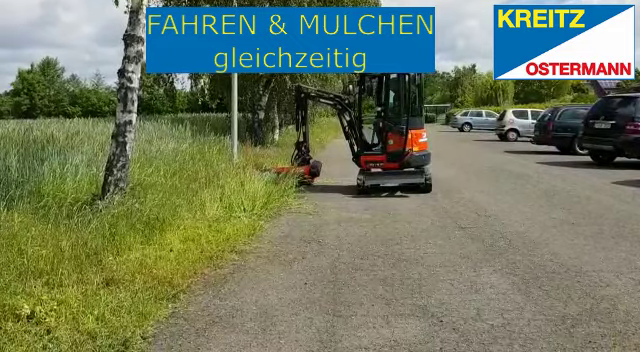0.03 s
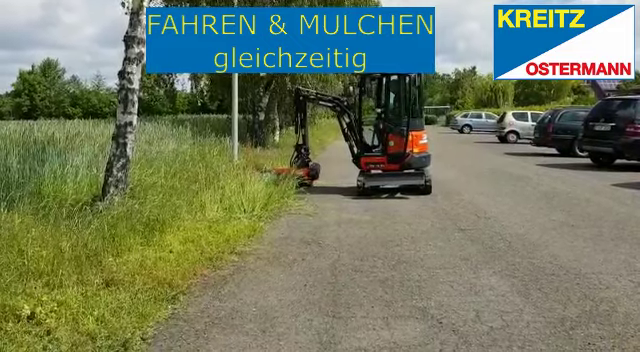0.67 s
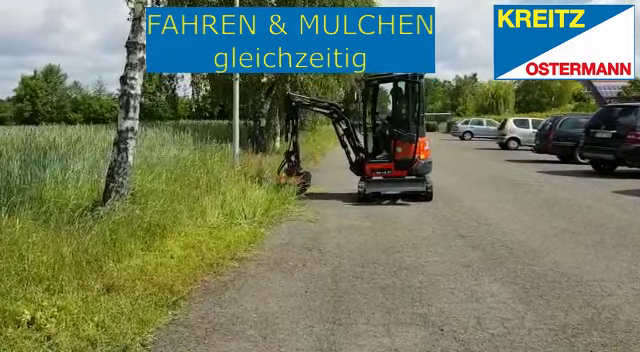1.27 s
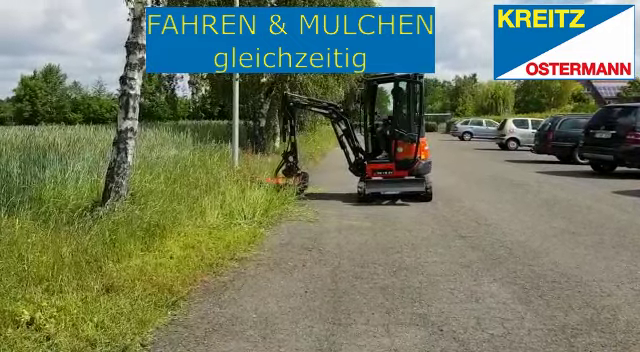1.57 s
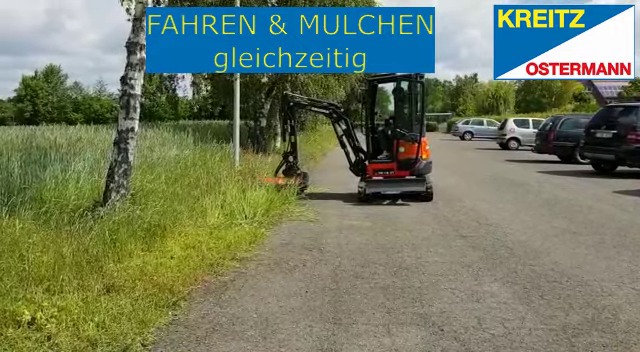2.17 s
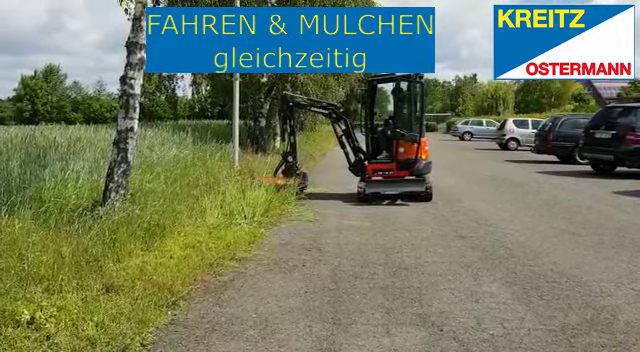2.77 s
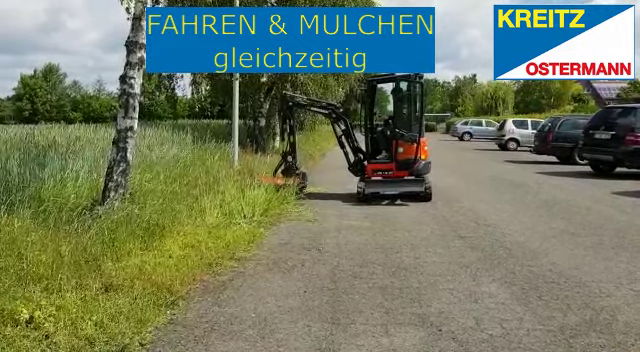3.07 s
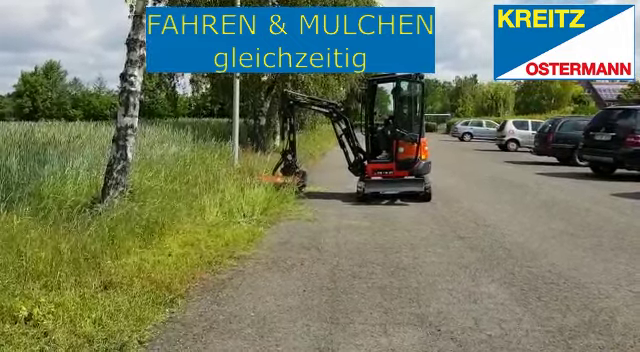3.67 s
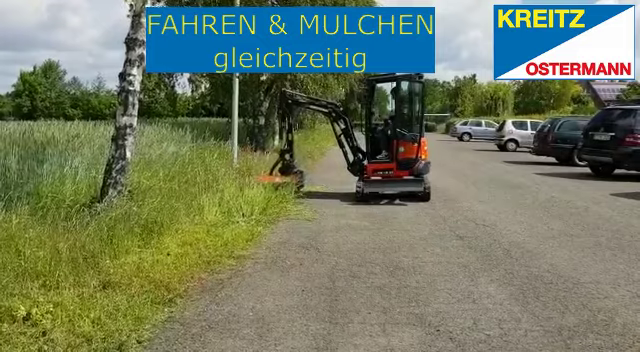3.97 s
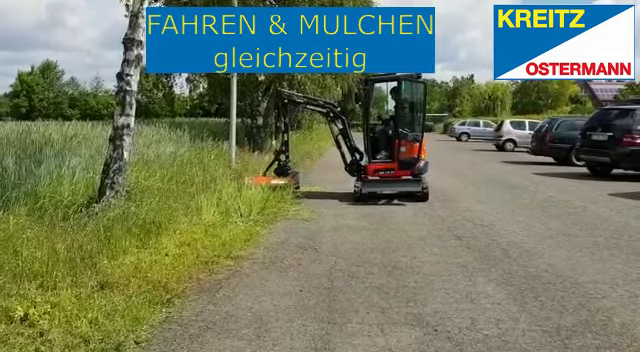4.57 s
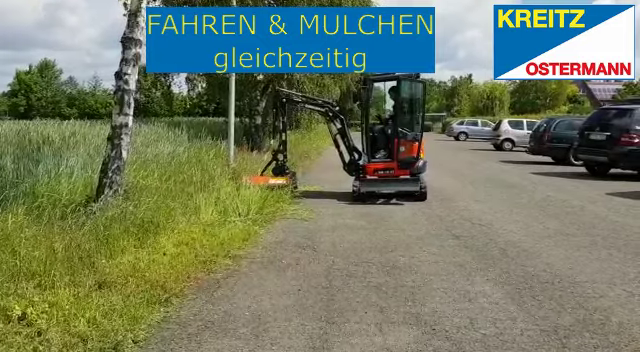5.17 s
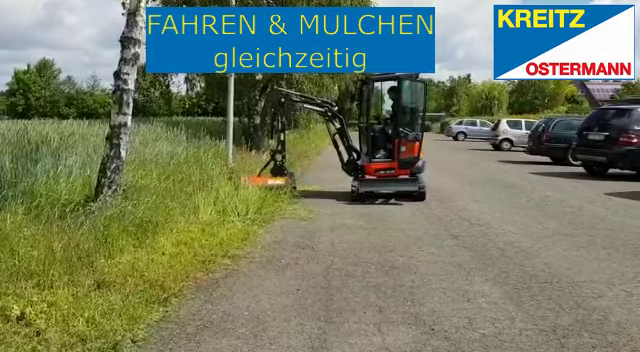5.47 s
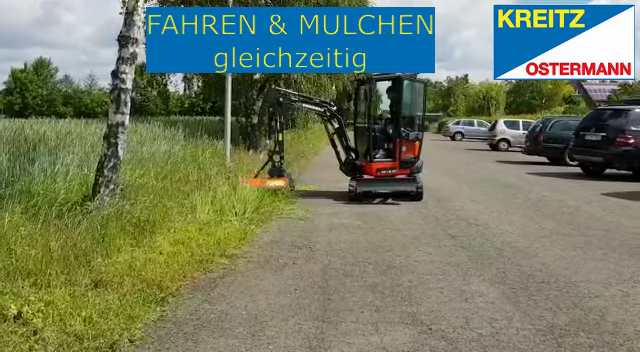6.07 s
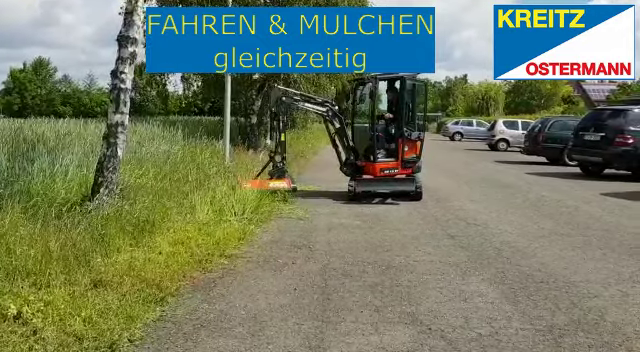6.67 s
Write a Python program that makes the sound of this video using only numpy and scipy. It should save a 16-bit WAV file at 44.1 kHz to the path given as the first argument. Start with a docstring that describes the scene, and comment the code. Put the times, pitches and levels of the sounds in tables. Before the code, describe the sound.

Steady diesel drone and clatter of a small excavator mulching grass, with occasional sharp snaps and a light breeze on the microphone.

```python
"""Car park, grass verge: a mini excavator creeps along with a mulching head on its boom.
The diesel drones at working speed, one exhaust pulse per firing; its fan beats against it, its covers
drum and clatter. The flails shred grass in swells, crunch tufts, snap stalks and graze something hard.
The hydraulic pump hums and whines under load. A light breeze buffets two microphone ports."""
import sys
import numpy as np
from scipy import signal
from scipy.fft import rfft, irfft, next_fast_len
from scipy.io import wavfile

SR = 44100
rng = np.random.default_rng(int(sys.argv[2]) if len(sys.argv) > 2 else 0)


def dump_mix(stems):
    """Bounce the given channels to the path in sys.argv[1] as a 16-bit WAV at rate SR."""
    frames = np.atleast_2d(stems).T  # one column per channel
    limited = np.clip(frames, -1, 1)  # hard clip at full scale
    pcm = np.round(limited * 32767).astype(np.int16)
    wavfile.write(sys.argv[1], SR, pcm)


N = 305172
TIME_S = np.arange(N) / SR
FFT_SIZE = 2 * next_fast_len(N // 2 + 4096)
BINS_HZ = np.maximum(np.arange(FFT_SIZE // 2 + 1) * SR / FFT_SIZE, 1)

# All table levels are relative.
# Diesel speed under the governor. Each row: time in seconds, firing rate in Hz.
FIRING_HZ = [(0.0, 57.22), (0.42, 57.07), (0.6, 58.07), (0.8, 56.22), (1.33, 57.61), (1.66, 57.13),
             (1.86, 55.9), (2.05, 56.67), (3.1, 56.46), (3.29, 57.38), (3.49, 55.06), (3.85, 57.21),
             (4.1, 56.35), (4.47, 57.44), (4.91, 55.81), (5.15, 56.92), (5.42, 56.42), (5.73, 57.72),
             (5.98, 56.33), (6.3, 57.05), (6.92, 57.08)]
# Engine load, rising as the machine nears. Each row: time in seconds, exhaust in dB, drumming in dB.
ENGINE_LOAD = [(0, -23.5, -35), (.9, -24, -34.5), (1.45, -23, -33), (2.8, -22, -33.5), (4.1, -22.5, -32.5),
               (6.92, -23, -32.5)]
# Exhaust pulse, its upper orders, fan and gears. Each row: multiple of the firing rate, level in dB.
EXHAUST_ORDERS = [(1, 1.5), (2, 1.5), (3, 0.57)]
BARK_ORDERS = [(4, -39.5), (5, -34.5), (6, -42), (7, -58.5)]
FAN_ORDERS = [(3.36, -40), (4.888, -39.5), (6.33, -46.5), (9.776, -53.5), (17, -58), (20, -57.5),
              (29.3, -63), (30, -59), (34, -63.5)]
# Grass feed into the head. Each row: time in seconds, shredding in dB.
GRASS_FEED = [(0.0, -48), (0.55, -52.5), (0.75, -57), (0.87, -46.5), (1.15, -42.5), (1.6, -42.5),
              (2.3, -47.5), (2.55, -54.4), (2.95, -59.5), (3.8, -55.8), (4.0, -47), (4.26, -38),
              (4.6, -42.5), (4.92, -52), (5.3, -43.5), (5.75, -42), (5.9, -45.5), (6.52, -39), (6.92, -46)]
# Tough tufts. Each row: centre in seconds, half length in seconds, chopping in dB, crunching in dB.
TOUGH_TUFTS = [(1.145, 0.026, -43, -40), (1.375, .016, -49, -39), (1.421, 0.0057, -49, -34.5),
               (1.562, .01, -43, -37), (1.594, 0.018, -32, -35.5), (1.92, 0.032, -39.5, -42.5),
               (2.27, 0.037, -48, -56), (4.178, 0.011, -40, -45), (4.266, 0.017, -33, -49),
               (6.13, 0.042, -41, -44.5), (6.506, 0.019, -41, -42)]
# Flail hits on stalks and grit. Each row: start in seconds, level in dB.
STALK_HITS = [(0.498, -46), (0.6044, -44), (0.9355, -42.5), (1.6594, -33.5), (1.9817, -38), (2.108, -38.5),
              (2.2363, -37.5), (2.283, -39), (2.3446, -44), (3.0963, -52), (3.6287, -42.5), (4.0463, -31.5),
              (4.3865, -41), (5.405, -40), (6.6313, -34)]
# Blade grazes. Each row: centre in seconds, half length in seconds, pitch in Hz, level in dB.
BLADE_GRAZES = [(5.755, .022, 4330, -44), (5.765, .016, 6950, -42)]
# Open hydraulic valves. Each row: start in seconds, end in seconds, hum in dB, whine in dB.
VALVE_OPENINGS = [(0, .4, -53, -53), (0.43, 1.17, -47, -55), (4.263, 4.965, -43, -60),
                  (5.022, 6.203, -46.5, -68), (6.378, 6.92, -41, -62)]
# Gusts. Each row: centre in seconds, half length in seconds, level in dB.
WIND_GUSTS = [(3.56, .15, -45), (4.6, .15, -42), (5.1, 0.15, -33), (5.71, 0.22, -34.5), (6.253, 0.36, -38),
              (6.89, 0.31, -32)]
# Source spectra. Each row: frequency in Hz, spectral density in dB.
DRUMMING_SPECTRUM = [(30, -19), (90, -31.5), (140, 2), (195, 4), (240, 0.5), (300, -1.5), (370, -10.5),
                     (480, -31), (800, -47)]
CLATTER_SPECTRUM = [(200, 1.5), (450, 3), (700, 0.5), (950, -4), (1350, -9.5), (1700, -9.5), (2150, -11),
                    (2600, -16.5), (3100, -11), (4500, -14.5), (7000, -36), (16000, -39)]
SHRED_SPECTRUM = [(300, 3), (1500, -22), (2200, 1), (3000, -3), (4500, 4.5), (9000, 0.5), (16000, 1.5)]
CHOP_SPECTRUM = [(150, -8.5), (450, -2), (800, 3), (1100, -6), (1400, -10), (1900, -2), (2150, -18.5),
                 (2600, -6), (3500, -8), (7000, -8.5), (16000, -51)]
CRUNCH_SPECTRUM = [(500, -28), (1500, -3), (3300, 4.5), (5500, 4.5), (7000, -0.5), (10000, -8),
                   (16000, -20)]
SNAP_SPECTRUM = [(500, -17), (2300, -6), (3800, 4), (6000, 1), (9000, -5), (12000, -4), (16000, -3)]
OIL_SPECTRUM = [(300, -17), (550, -2.5), (800, 11.5), (1000, -11.5), (1400, -3), (1700, -15), (2200, -27),
                (5000, -14)]
HISS_SPECTRUM = [(500, -26), (1000, -7.5), (1500, 1.5), (2100, -3.5), (2600, 3), (3500, -7.5), (8000, -21)]
BREEZE_SPECTRUM = [(15, -11), (35, -12), (65, 0.5), (100, -3.5), (160, -6), (300, -28.5), (1000, -90)]
# Resonances of panels and oil flow. Each row: centre in Hz, width in Hz, gain in dB.
PANEL_RESONANCES = [(1860, 63, 0), (2176, 115, -17.5), (2380, 490, 13.5), (3830, 99, 0)]
OIL_RESONANCES = [(1846, 20, 40), (2460, 120, 10), (830, 76, 2.3)]
# Narrow treble peaks of the microphone ports, colouring the shredding.
# Each row: centre in Hz, width in Hz, gain in dB.
PORT_RIPPLE_PEAKS = [(4250, 230, 7.7), (5170, 100, 2.9), (5960, 160, 2.8), (11460, 400, 1.1),
                     (14720, 210, 16.8), (15650, 300, 5.5)]
# Microphone port responses. Each row: frequency in Hz, gain in dB.
LEFT_RESPONSE = [(55, -2.5), (120, -0.06), (300, 0.66), (600, 0), (2400, -6.5), (3800, -10), (4500, -6.5),
                 (6800, -7), (7400, -25), (8050, -6), (9200, 15.5), (10400, 7), (12100, 11), (13400, -5),
                 (16000, -10)]
RIGHT_RESPONSE = [(55, 0.5), (120, -0.6), (300, 2), (600, 4), (2500, 2.5), (3200, -2.5), (4400, 2),
                  (6000, 3), (6850, -1), (7500, -13), (8700, -12), (9700, -8.5), (10900, 8.5), (12300, 0.5),
                  (13200, -7), (16000, -14)]
# Likeness of the ports. Each row: frequency in Hz, correlation (negative in opposite phase).
PORT_CORRELATION = [(100, 1), (500, 0.96), (1100, 0.84), (1600, 0.77), (2500, 0.31), (3200, -0.13),
                    (3900, 0.45), (4350, -0.71), (5800, -0.82), (6700, 0.1), (8500, -0.51), (9700, 0.48),
                    (10800, 1), (13300, 0.63), (15000, 0.6)]


def diesel(firings, exhaust_db, drumming_db):
    """Exhaust orders sum to one pulse per firing; upper orders and fan swell with load."""
    throb = -tones(firings, EXHAUST_ORDERS, waver_db=0.46, waver_hz=7.7)
    throb *= from_db(exhaust_db - 2.5 + 0.22 * drift(35))
    bark = -tones(firings, BARK_ORDERS, waver_db=1.0, waver_hz=15.4)
    fan = tones(firings + 0.0035 * drift(2.6), FAN_ORDERS, waver_db=2.0, waver_hz=6.5)
    return throb + (bark + fan) * from_db(1.57 * (drumming_db + 31.5))


def bodywork(firings, drumming_db):
    """Each firing shakes the covers: low drumming, plus valve and track clatter ringing in the panels."""
    shake = np.cos(2 * np.pi * firings)
    drumming = rms_one(colour(noise() * from_db(2.8 * shake), DRUMMING_SPECTRUM))
    knocks = grains(12000, size_db=3.0, cap=2.8) * from_db(-.6 * shake + drift(26))
    steps_per_turn = 1550  # valve knocks repeat each crankshaft turn (two firings)
    valve_gear = knocks[:, (firings / 2 * steps_per_turn).astype(int) % steps_per_turn]
    clatter = rms_one(colour(knocks + from_db(-8.5) * valve_gear, CLATTER_SPECTRUM, PANEL_RESONANCES))
    return drumming * from_db(drumming_db - 1.0) + clatter * from_db(-45.0)


def mulcher():
    """Grass tears in clumps, a tick per blade; thick growth adds duller chopping under the hood."""
    feed_db, = in_time(GRASS_FEED)
    uneven_db = drift(15)
    shred_gain = from_db(feed_db + .5 * uneven_db + 2.5)
    chop_gain = from_db(-41.5 + 0.57 * (feed_db - feed_db.mean()) + uneven_db)
    chop_gain += sum(from_db(db) * swell(at_s, half_s) for at_s, half_s, db, _ in TOUGH_TUFTS)
    clumps = from_db(2.54 * drift(200) + 1.8 * drift(9.3))
    ticks = grains(22000, size_db=2.0, cap=4.9) * clumps
    shredding = rms_one(colour(ticks, SHRED_SPECTRUM, PORT_RIPPLE_PEAKS))
    chops = grains(9000, size_db=0.0, cap=1.7) * from_db(1.67 * drift(34))
    chopping = rms_one(colour(chops, CHOP_SPECTRUM, PANEL_RESONANCES))
    return shredding * shred_gain + chopping * chop_gain * from_db(-5.0)


def crunches():
    """A tough tuft gives a short, dense burst of cracks."""
    bursts = sum(from_db(db) * swell(at_s, half_s) for at_s, half_s, _, db in TOUGH_TUFTS)
    cracks = grains(12000, size_db=1.5, cap=3)
    return bursts * rms_one(colour(cracks, CRUNCH_SPECTRUM))


def snaps(crack_s=0.0023, tail_s=0.0056, tail_db=-14.5):
    """A stalk breaks: sharp crack of splinters, faint tail."""
    splinters, age_s = np.zeros((2, N)), TIME_S[:SR // 20]
    decay = np.exp(-age_s / crack_s) + from_db(tail_db) * np.exp(-age_s / tail_s)
    for start_s, db in STALK_HITS:
        at = round(start_s * SR)
        signs = rng.choice([-1, 1], (2, len(age_s)))
        splinters[:, at:at + len(age_s)] += from_db(db + 7.5) * decay * signs
    return colour(splinters, SNAP_SPECTRUM)


def squeaks():
    """A blade grazes something hard and sings briefly, unsteady in pitch."""
    wobble_rad = 0.62 * drift(60)
    return sum(from_db(db) * swell(at_s, half_s) * np.sin(2 * np.pi * hz * TIME_S + wobble_rad)
               for at_s, half_s, hz, db in BLADE_GRAZES)


def pump_gains(rise_s=0.043, fall_s=0.2):
    """Hum and whine follow pressure: up as a valve opens, back to idle once it shuts."""
    hum, whine = from_db(-59), from_db(-64.5)  # idle
    for start_s, end_s, hum_db, whine_db in VALVE_OPENINGS:
        pressure = np.clip(np.minimum((TIME_S - start_s) / rise_s, 1 - (TIME_S - end_s) / fall_s), 0, 1)
        hum = np.maximum(hum, pressure * from_db(hum_db))
        whine = np.maximum(whine, pressure * from_db(whine_db))
    return hum, whine


def pump(firings):
    """Pressure ripple at order 8 beats with a line just below; oil sings and hisses through the valves."""
    hum_gain, whine_gain = pump_gains()
    cycles = firings + 0.0022 * drift(12)
    hum = tones(cycles, [(8, 1.5), (7.75, -9), (32, -16)], waver_db=2.0, waver_hz=12)
    whine = tones(cycles, [(16, 2.0)], waver_db=2.0, waver_hz=7)
    oil = from_db(-9.5) * rms_one(colour(noise(), OIL_SPECTRUM, OIL_RESONANCES))
    hiss = from_db(3.0) * rms_one(colour(noise(), HISS_SPECTRUM))
    return hum * hum_gain + whine * whine_gain + spread(oil * hum_gain + hiss * whine_gain)


def breeze():
    """Lumpy low buffeting, partly shared by the ports; gusts over a steady breeze."""
    gusts = sum(from_db(db) * swell(at_s, half_s) for at_s, half_s, db in WIND_GUSTS)
    strength = from_db(-47.5) + gusts
    puffs = noise() + from_db(-4.5) * noise()[0]
    return rms_one(colour(puffs, BREEZE_SPECTRUM)) * strength * from_db(3.5 + 3.2 * drift(20))


def tones(cycles, orders, waver_db, waver_hz):
    """Stereo engine orders, each wavering in level; left lags in phase."""
    lag_rad = np.array([[.3], [0]])
    return sum(from_db(db + waver_db * drift(waver_hz)) * np.cos(2 * np.pi * order * cycles - lag_rad)
               for order, db in orders)


def grains(per_s, size_db, cap):
    """Two random click trains, rms 1; sizes spread over size_db * cap decibels, mostly small."""
    sizes = from_db(size_db * np.minimum(rng.exponential(1, (2, N)), cap))
    hits = rng.random((2, N)) < per_s / SR
    return rms_one(hits * sizes * rng.choice([-1, 1], (2, N)))


def noise():
    """Two independent white noises."""
    return rng.standard_normal((2, N))


def drift(rate_hz):
    """Slow random wander, rms 1: noise through a double one-pole low-pass."""
    hop, settle = 40, 2000
    pole = np.exp(-2 * np.pi * hop * rate_hz / SR)
    white = rng.standard_normal(N // hop + settle + 2)
    slow = signal.lfilter([1], [1, -2 * pole, pole * pole], white)[settle:]
    return np.interp(np.arange(N) / hop, np.arange(len(slow)), rms_one(slow))


def swell(at_s, half_s):
    """Bell-shaped envelope."""
    return np.exp(-np.minimum(((TIME_S - at_s) / half_s) ** 2, 20))


def colour(x, spectrum, resonances=()):
    """Minimum-phase filter: spectrum plus resonances."""
    peaks_db = sum(db / (1 + (2 * (BINS_HZ - hz) / width_hz) ** 2) for hz, width_hz, db in resonances)
    cepstrum = irfft(np.log(from_db(at_bins(spectrum) + peaks_db)))
    cepstrum[1:FFT_SIZE // 2] *= 2
    cepstrum[FFT_SIZE // 2 + 1:] = 0
    return irfft(rfft(x, FFT_SIZE) * np.exp(rfft(cepstrum)))[..., :N]


def spread(pair):
    """Mix two independent signals to left and right with the ports' correlation."""
    mid, side = rfft(pair, FFT_SIZE)
    alike = at_bins(PORT_CORRELATION)
    return irfft(np.sqrt((1 + alike) / 2) * mid + np.sqrt((1 - alike) / 2) * side * [[1], [-1]])[:, :N]


def in_time(rows):
    """Interpolate each column to every sample."""
    times_s, *columns = np.transpose(rows)
    return [np.interp(TIME_S, times_s, column) for column in columns]


def at_bins(rows):
    """Interpolate to the FFT bins in log frequency."""
    hz, values = np.transpose(rows)
    return np.interp(np.log(BINS_HZ), np.log(hz), values)


def from_db(db):
    """Decibels to gain."""
    return 10 ** (db / 20)


def rms_one(x):
    """Scale to rms 1."""
    return x / np.sqrt(np.mean(x ** 2) + 1e-20)


def scene():
    """Engine speed drives diesel, pump and bodywork; cutting and breeze add on top."""
    firings = np.cumsum(in_time(FIRING_HZ)[0]) / SR
    exhaust_db, drumming_db = in_time(ENGINE_LOAD)
    fade_in = np.minimum(TIME_S / .006, 1)
    drone = (diesel(firings, exhaust_db, drumming_db) + pump(firings)) * fade_in
    cutting = mulcher() + crunches() + snaps()
    return drone + spread(bodywork(firings, drumming_db) + cutting) + squeaks() + breeze()


def record(dry):
    """Each port colours its channel; a steep low-pass cuts the top."""
    cutoff_hz = 15900
    heard = np.array([colour(dry[0], LEFT_RESPONSE), colour(dry[1], RIGHT_RESPONSE)])
    return signal.sosfilt(signal.ellip(10, .2, 80, cutoff_hz, fs=SR, output="sos"), heard)


dry = scene()
out = record(dry)
dump_mix(out)
```